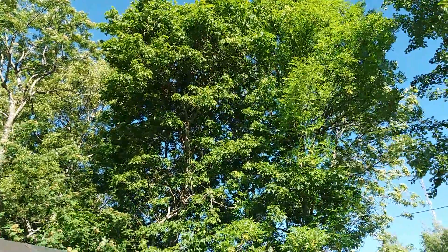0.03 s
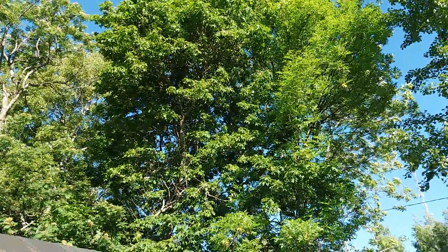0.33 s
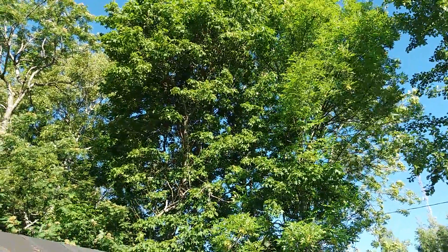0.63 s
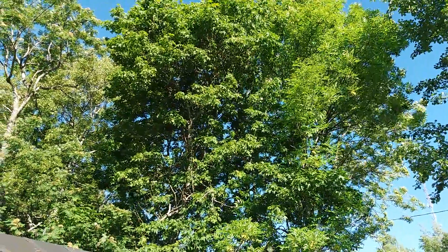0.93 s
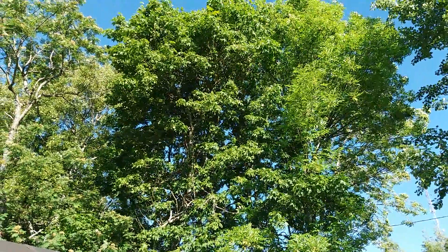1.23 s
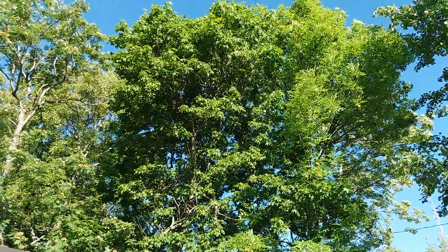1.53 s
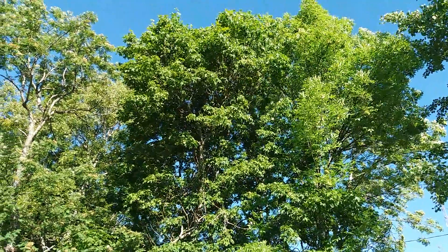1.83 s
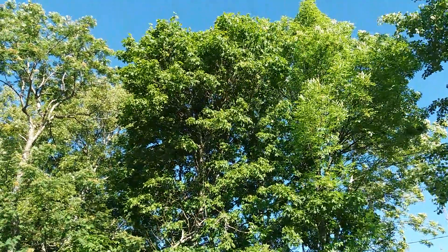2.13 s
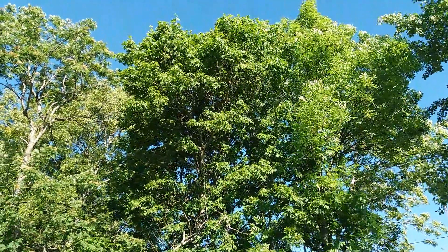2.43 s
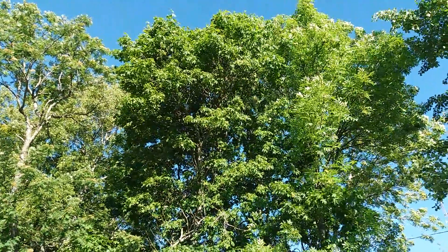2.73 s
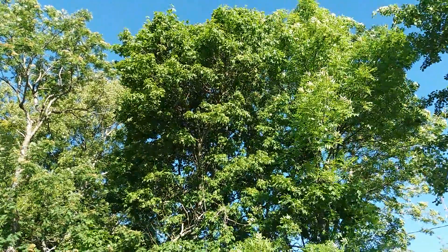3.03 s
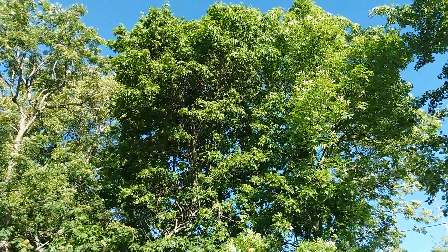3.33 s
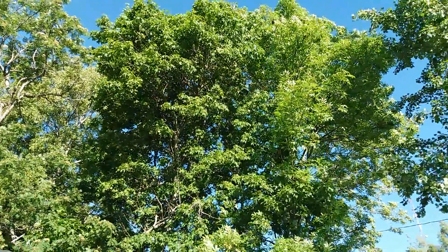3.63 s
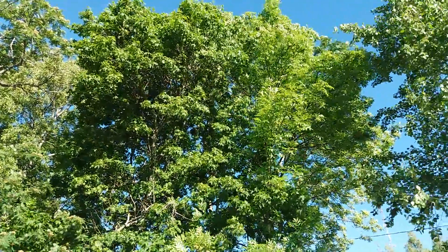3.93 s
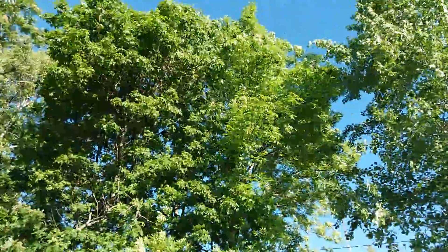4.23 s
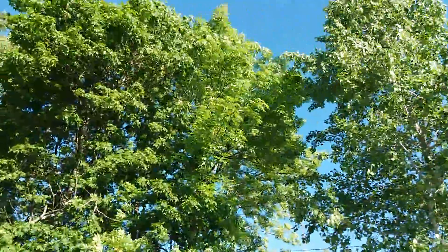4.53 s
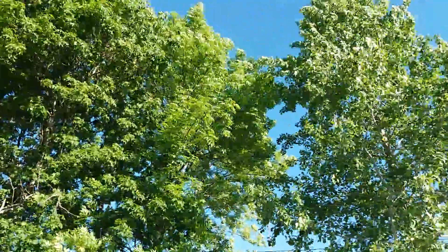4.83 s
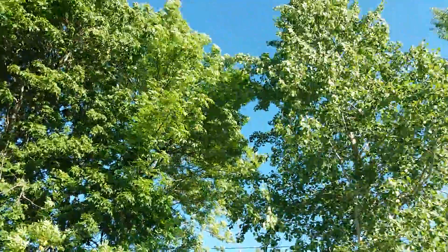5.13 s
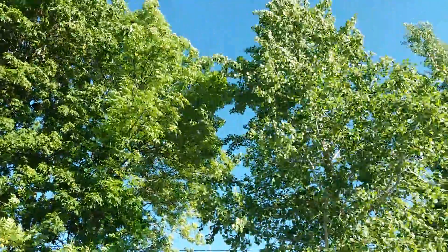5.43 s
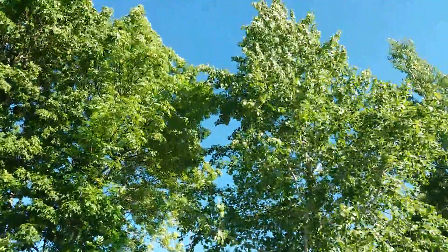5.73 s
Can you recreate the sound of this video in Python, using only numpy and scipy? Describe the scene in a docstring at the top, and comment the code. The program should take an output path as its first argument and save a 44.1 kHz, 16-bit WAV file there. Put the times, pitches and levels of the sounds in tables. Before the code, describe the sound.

Outdoors under tall trees, a steady hiss of leaves and a low rush of air slowly grow louder. Close up, wind flutters and thumps softly against the hand-held microphone, with one soft handling knock. Faint, high bird whistles come from far away in the first half, and a buzzy two-note call sounds twice in the distance as the breeze reaches its height.

```python
"""Under tall broadleaf trees in a breeze, heard in mono from a hand-held camera's microphone.
From the start, countless leaves brush and tap over the deeper rush of the crowns, and small birds
whistle thin, mostly falling notes far off. Right at the microphone, gusts and eddies thud softly;
at 1.4 s the camera is bumped once. The breeze swells to its height near 5 s, and as it does
a distant, buzzy two-note call is sung twice."""
import sys
import numpy as np
from scipy import signal
from scipy.fft import rfft, irfft
from scipy.io import wavfile

SR = 44100
rng = np.random.default_rng(int(sys.argv[2]) if len(sys.argv) > 2 else 0)


def materialize(psi):
    """Save the field psi as 16-bit PCM at rate SR to the path in sys.argv[1].

    A 1-D psi becomes a single channel; in a 2-D psi each row is a channel.
    """
    bounded = np.clip(np.atleast_2d(psi).T, -1, 1)
    quanta = np.round(bounded * 32767).astype(np.int16)
    wavfile.write(sys.argv[1], SR, quanta)


N = 254456
TIME = np.arange(N) / SR
FREQ = np.fft.rfftfreq(N, 1 / SR)

# the breeze in the trees, relative to its height: time_s, level_db
BREEZE_SWELL = [(0.05, -5.5), (0.96, -5), (2.46, -2), (3.74, -2), (5.21, 0), (5.7, -0.5)]
# spectra of the crowns, the mass of leaves and the nearest leaves: frequency_hz, gain_db
RUSH_SPECTRUM = [(40, -24), (110, -4), (200, 1.5), (350, 0), (650, 0.5), (1100, -2.5), (1800, -6),
                 (3000, -11), (6000, -32)]
RUSTLE_SPECTRUM = [(700, -16), (1400, -6.5), (2200, -3), (3200, 1), (4300, 0.5), (5300, 0.5), (5700, -1.5),
                   (6100, -7.5), (6500, -16), (7000, -25.5), (8200, -49), (15000, -52)]
SIZZLE_SPECTRUM = [(3000, -8), (5700, 9), (6500, 10), (7300, 4), (8600, -4), (10500, 3), (12500, 4.5),
                   (14200, 4.5), (15600, 10.5)]
# thin whistles far off: start_s, length_s, start_pitch_hz, end_pitch_hz, level_db
FAR_WHISTLES = [(0.015, 0.088, 4340, 4560, -61), (0.478, 0.2, 5520, 4050, -59),
                (0.495, 0.15, 6070, 5480, -60.5), (2.535, 0.13, 5500, 4940, -54),
                (3.118, 0.037, 4170, 4080, -52)]
# the strongest eddies, each a thud, ahead of the capsule's response: peak_s, level_db, width_s
STRONG_EDDIES = [(0.263, -41, 0.013), (0.354, -44, 0.016), (0.685, -37.5, 0.015), (0.728, -37, 0.018),
                 (0.83, -35.5, 0.027), (1.763, -25.5, 0.012), (1.787, -35, 0.023), (2.199, -36.5, 0.012),
                 (2.545, -31, 0.0099), (2.656, -31.5, 0.011), (2.692, -34.5, 0.018), (2.949, -36, 0.017),
                 (3.135, -34.5, 0.016), (3.473, -33.5, 0.022), (3.617, -32, 0.015), (3.729, -27.5, 0.012),
                 (3.904, -35.5, 0.0157), (4.133, -32.5, 0.014), (4.239, -31, 0.0212), (4.271, -26, 0.012),
                 (4.323, -28.5, 0.023), (4.447, -28, 0.013), (4.778, -30.5, 0.0092), (4.948, -34.5, 0.015)]
# gusts at the microphone, ahead of the capsule's response: peak_s, level_db, half_width_s
MICROPHONE_GUSTS = [(0.77, -44, 0.15), (1.802, -43.5, 0.082), (2.206, -47, 0.061), (2.953, -51, 0.48),
                    (3.774, -45, 0.2), (4.304, -38.5, 0.14), (4.82, -50.5, 0.24)]
# spectra of the air at the microphone and of the swirls that eddies shed: frequency_hz, gain_db
AIR_SPECTRUM = [(22, -42), (38, -18), (55, 4), (85, 3), (135, 0.5), (200, -8), (320, -24), (500, -20),
                (900, -54)]
SWIRL_SPECTRUM = [(60, -24), (120, -2.5), (190, 1.5), (300, -6), (450, -15.5), (700, -29), (1400, -53)]
# the capsule's response to wind and handling, weak in the deepest bass: frequency_hz, gain_db
CAPSULE_RESPONSE = [(22, -30), (38, -15), (52, 2.5), (1000, -4.5)]
# the ring of the camera body: pitch_hz, relative_level_db, t60_s
CAMERA_MODES = [(139, -14, .035), (308, 3, 0.013), (540, 1, 0.0089)]
# the distant two-note calls: start_s, pitch_hz, level_db
FAR_CALLS = [(3.805, 5220, -50), (4.969, 4970, -49)]
# the notes of a call: delay_s, length_s, start_pitch_ratio, end_pitch_ratio, relative_level_db, buzz
NOTE_PAIR = [(0, 0.23, 1, 0.922, -0.5, 0.803), (0.205, 0.135, 0.834, 0.825, -2, 0.56)]


def undb(db):
    """Decibels to gain."""
    return 10 ** (np.asarray(db) / 20)


def unit(x):
    """Scale to rms 1."""
    return x / np.sqrt(np.mean(x ** 2))


def walk(hz):
    """A smooth random drift of rms 1 that moves about hz times a second."""
    spectrum = rfft(rng.standard_normal(N)) * np.exp(-(FREQ / hz) ** 2)
    return unit(irfft(spectrum * (FREQ > 0), N))


def colour(x, points):
    """Filter by a spectrum of (frequency_hz, gain_db) points."""
    hz, db = np.transpose(points)
    gain_db = np.interp(np.log(FREQ + 1), np.log(hz), db)
    return irfft(rfft(x) * undb(gain_db), N)


def swaying_boughs(x, rate_hz, depth_db, count=12):
    """Every bough sways on its own: overlapping bands swell and sink separately."""
    band_position = np.interp(np.log(FREQ + 1), np.log([200, 16000]), [0, count - 1])
    spectrum = rfft(x)
    bands = (irfft(spectrum * np.maximum(1 - abs(band_position - k), 0), N) for k in range(count))
    return sum(band * undb(depth_db * walk(rate_hz)) for band in bands)


def leaf_taps(swell_db, peak_per_s, brush_s):
    """Leaves tap each other, more often in stronger wind; each tap is a short dry brush."""
    taps_per_s = peak_per_s * undb(swell_db)
    taps = (rng.random(N) < taps_per_s / SR) * rng.standard_normal(N)
    # the energy of the overlapping brushes adds up and dies away
    energy = signal.lfilter([1], [1, -np.exp(-1 / (brush_s * SR))], taps ** 2)
    return unit(np.sqrt(energy) * rng.standard_normal(N))


def trees(rush_db=-49, rustle_db=-45, sizzle_db=-57.5):
    """Air rushes through the crowns; masses of leaves rustle, and the nearest add a fine sizzle."""
    swell_db = np.interp(TIME, *np.transpose(BREEZE_SWELL))
    rush = swaying_boughs(rng.standard_normal(N), rate_hz=5.6, depth_db=0.47)
    leaves = leaf_taps(swell_db, peak_per_s=17000, brush_s=0.0031)
    rustle = swaying_boughs(leaves, rate_hz=14, depth_db=0.12)
    sizzle = leaf_taps(swell_db, peak_per_s=31000, brush_s=0.0043)
    # the rush barely follows the swell; the sizzle grows fastest
    return (unit(colour(rush, RUSH_SPECTRUM)) * undb(rush_db + 0.15 * swell_db)
            + unit(colour(rustle, RUSTLE_SPECTRUM)) * undb(rustle_db + swell_db)
            + unit(colour(sizzle, SIZZLE_SPECTRUM)) * undb(sizzle_db + 1.85 * swell_db))


def whistle(start_s, length_s, start_hz, end_hz, level_db, buzz):
    """One bird note: the pitch slides fast at first, then settles, with a quick tremble."""
    progress = np.clip((TIME - start_s) / length_s, 0, 1)
    slide_hz = end_hz + (start_hz - end_hz) * (1 - progress) ** 1.5
    pitch_hz = slide_hz * (1 + buzz * 0.0195 * walk(hz=170))
    envelope = np.sqrt(2 * abs(np.sin(np.pi * progress)))
    return undb(level_db) * envelope * np.sin(2 * np.pi * np.cumsum(pitch_hz) / SR)


def far_birds(echo_t60_s=0.35, echo_db=-6):
    """Notes from far off in the trees, smeared by echoes from trunks and foliage."""
    song = sum(whistle(*row, buzz=0.089) for row in FAR_WHISTLES)
    song += sum(two_note_call(*row) for row in FAR_CALLS)
    scatter = rng.standard_normal(N) * undb(-60 * TIME / echo_t60_s)
    echoes = signal.fftconvolve(song, scatter / np.linalg.norm(scatter))[:N]
    return song + undb(echo_db) * echoes


def eddy(peak_s, level_db, width_s, pitch_hz=109.15, wander=0.322):
    """A swirl passing the microphone swings the pressure a few uneven times: a soft thud."""
    envelope = np.exp(-2 * np.log(2) * ((TIME - peak_s) / width_s) ** 2)
    passing = envelope > 1e-4
    unevenness = np.interp(TIME[passing] - peak_s, np.linspace(-.08, .08, 40), rng.standard_normal(40))
    turns = rng.random() + np.cumsum(pitch_hz * np.exp(wander * unevenness)) / SR
    thud = np.zeros(N)
    thud[passing] = undb(level_db) * envelope[passing] * np.sin(2 * np.pi * turns)
    return thud


def small_eddies(gust_db, per_s=12, above_gust_db=3.5, width_s=0.01296):
    """Rows for weaker eddies at random moments, each following the level of the gust that carries it."""
    moments = rng.random(int(per_s * N / SR)) * TIME[-1]
    return [(peak_s, np.interp(peak_s, TIME, gust_db) + above_gust_db, width_s) for peak_s in moments]


def gust_level(calm_db=-64.5):
    """Level of the air at the microphone in dB: each gust swells and dies away over the calm."""
    power = sum(undb(level_db) ** 2 * np.exp(-((TIME - peak_s) / half_width_s) ** 2)
                for peak_s, level_db, half_width_s in MICROPHONE_GUSTS)
    return 10 * np.log10(power + undb(calm_db) ** 2)


def wind_on_microphone(swirl_db=-11):
    """A low flutter of air with single thuds; strong eddies break up into smaller, higher swirls."""
    gust_db = gust_level()
    air = unit(colour(rng.standard_normal(N), AIR_SPECTRUM)) * undb(gust_db + walk(hz=23))
    swirls = unit(colour(rng.standard_normal(N), SWIRL_SPECTRUM))
    thuds = sum(eddy(*row) for row in STRONG_EDDIES + small_eddies(gust_db))
    thud_envelope = abs(signal.hilbert(thuds))
    return air + thuds + undb(swirl_db) * thud_envelope * swirls


def camera_bump(start_s=1.388, gain_db=-29.5, contact_s=0.00045):
    """A soft knock rings the camera body; the yielding contact rounds its attack."""
    age_s = np.maximum(TIME - start_s, 0)
    ring = sum(undb(db - 60 * age_s / t60_s) * np.sin(2 * np.pi * hz * age_s)
               for hz, db, t60_s in CAMERA_MODES)
    attack = 1 - np.exp(-age_s / contact_s)
    return undb(gain_db) * ring * attack


def two_note_call(start_s, pitch_hz, level_db):
    """A bird sings a buzzy falling note, then a lower, nearly level one."""
    return sum(whistle(start_s + delay_s, length_s, pitch_hz * start, pitch_hz * end, level_db + db, buzz)
               for delay_s, length_s, start, end, db, buzz in NOTE_PAIR)


def scene():
    """One microphone feeds both channels: trees and birds at a distance, wind and handling up close."""
    far = trees() + far_birds()
    close = colour(wind_on_microphone() + camera_bump(), CAPSULE_RESPONSE)
    return np.array([far + close, far + close])


def record(dry, cutoff_hz=15700):
    """The camera's recorder cuts the top treble steeply."""
    return signal.sosfilt(signal.ellip(12, .1, 70, cutoff_hz, fs=SR, output="sos"), dry)


dry = scene()
out = record(dry)
materialize(out)
```